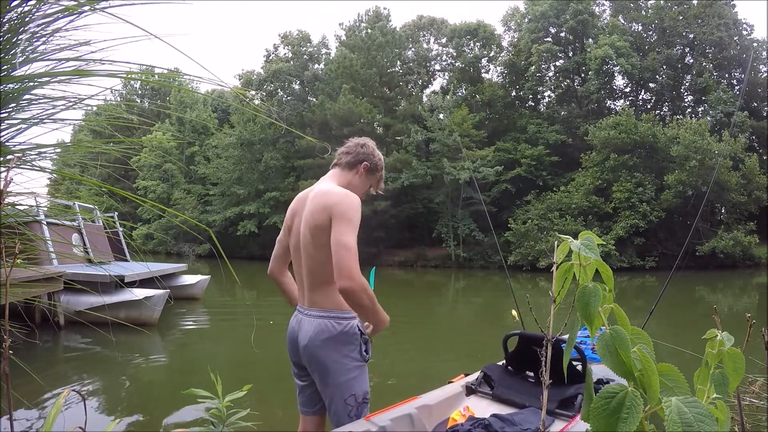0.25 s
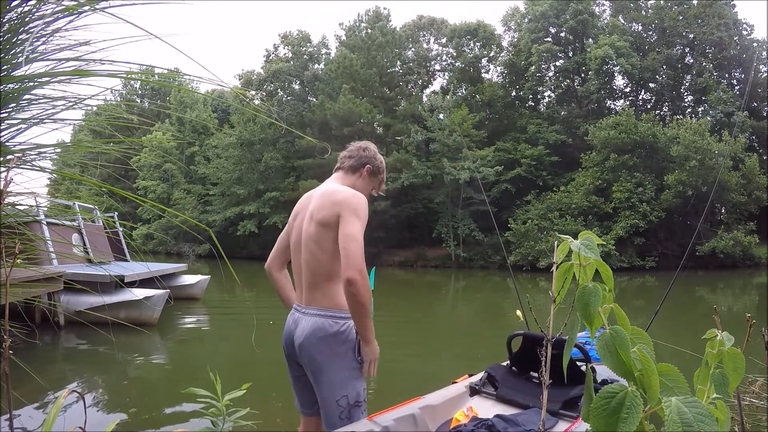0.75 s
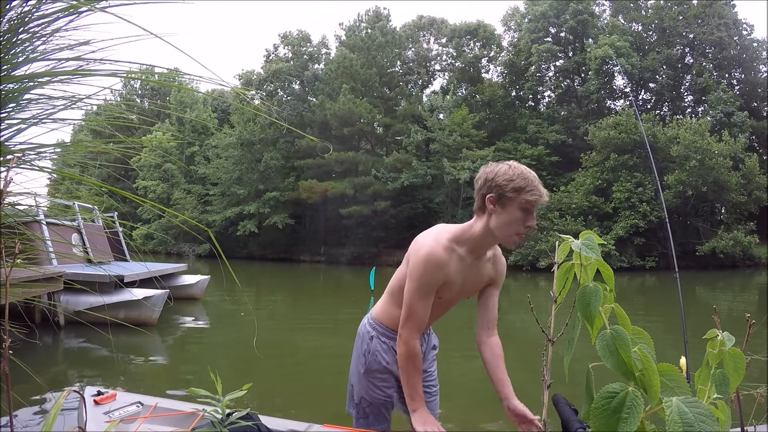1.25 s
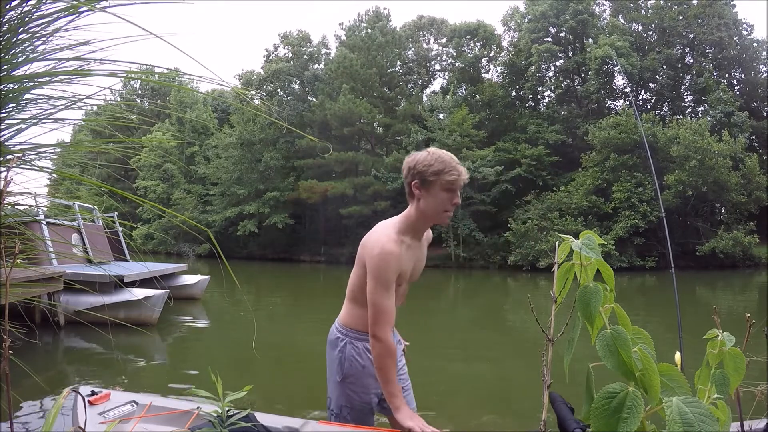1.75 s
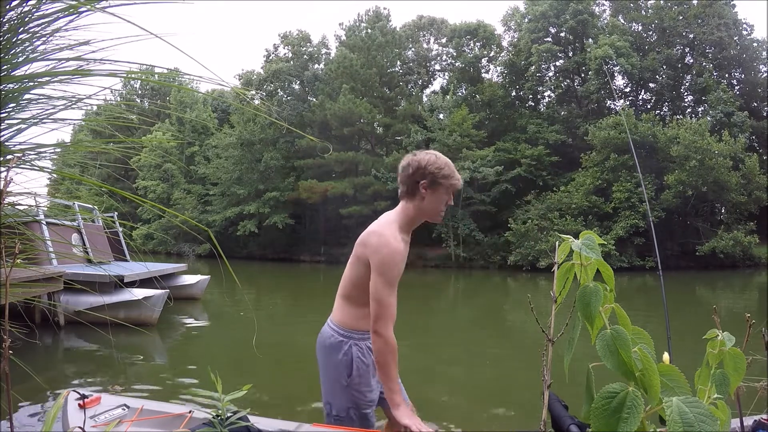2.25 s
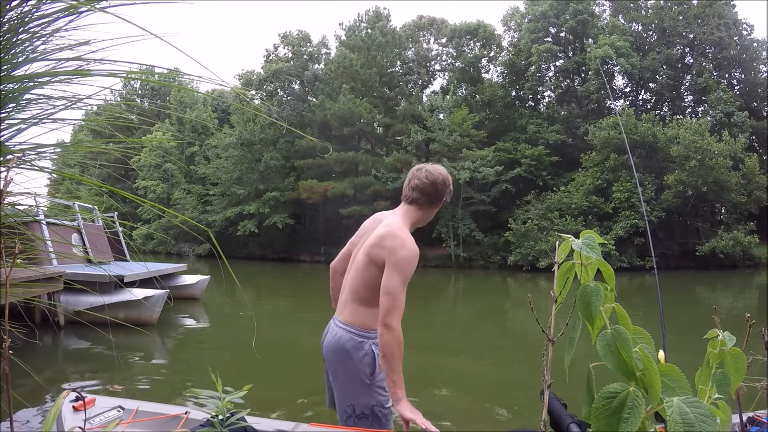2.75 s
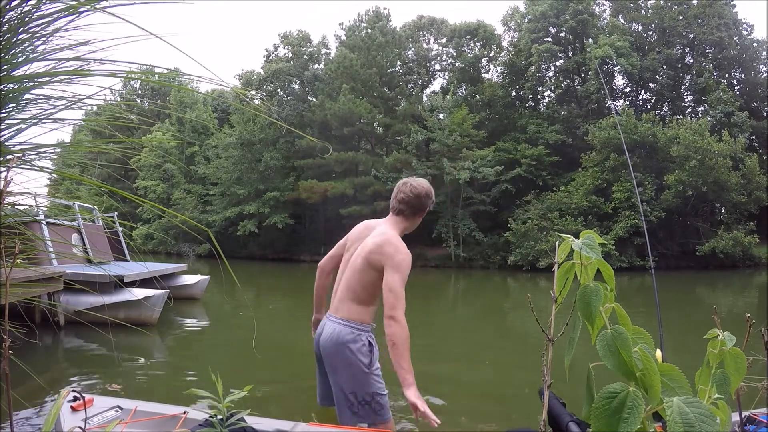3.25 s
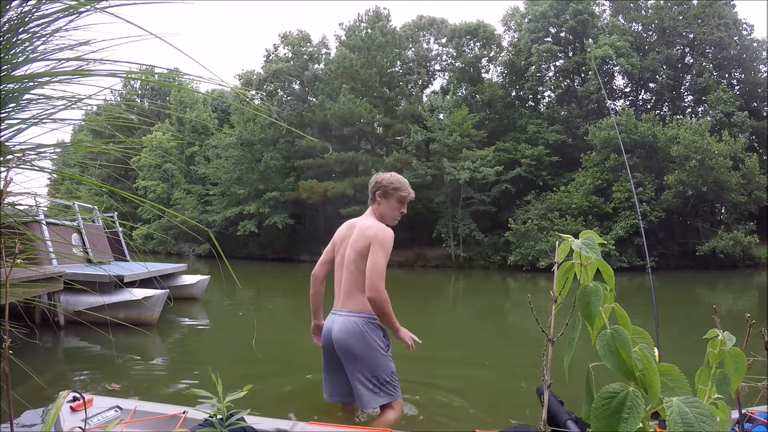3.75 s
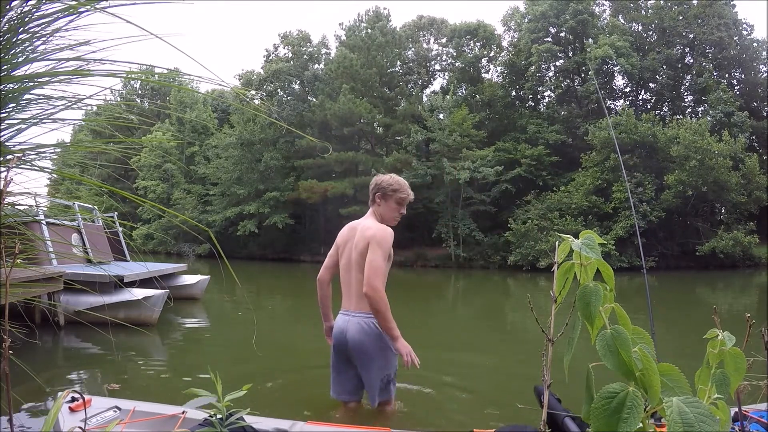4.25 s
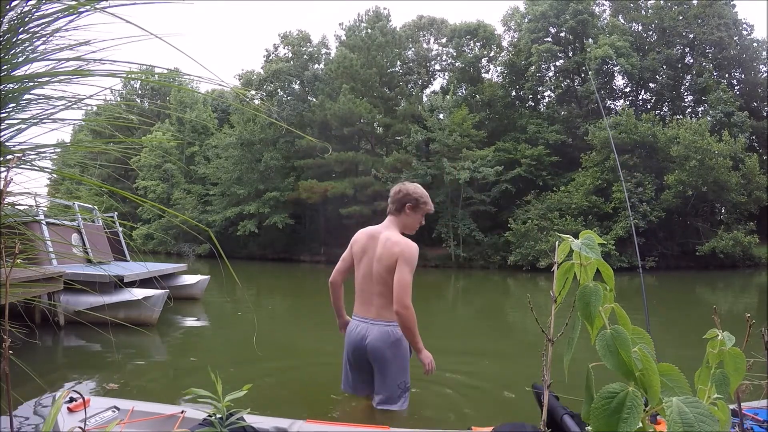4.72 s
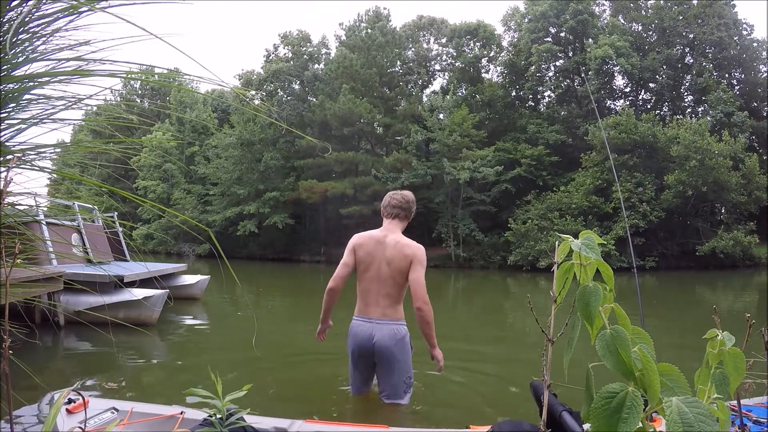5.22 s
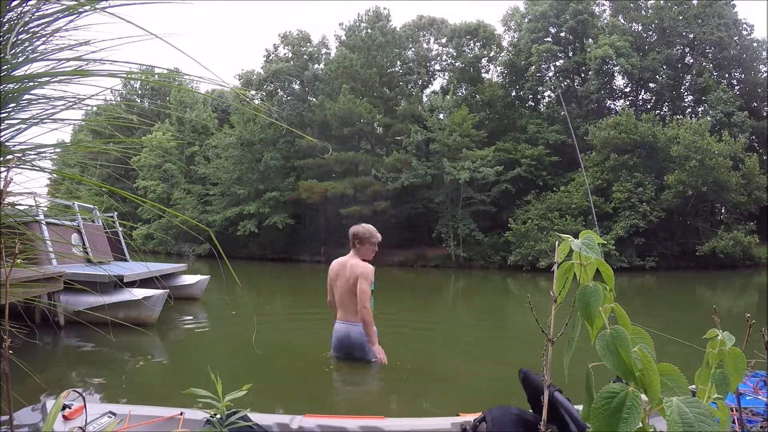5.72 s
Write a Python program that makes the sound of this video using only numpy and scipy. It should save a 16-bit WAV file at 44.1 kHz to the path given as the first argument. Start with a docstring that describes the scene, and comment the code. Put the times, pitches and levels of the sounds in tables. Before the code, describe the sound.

At a quiet lake shore, dry knocks give way to hollow thuds, bubbling splashy wading steps and sparse bird chirps, then an abrupt stop.

```python
"""A kayak and a wader at a lake shore

A kayak clacks and thuds while a person wades into shallow water. Plastic knocks and hull thuds are ringing tones,
and one bare click is a short ring. Steps crackle with random droplets, splash, and trap air bubbles that ring as
sliding, dying tones. Insects, leaves and wind on the microphone are noise shaped in pitch and loudness.
One bird chips three times and a farther one calls once, both as gliding whistles.
Faint echoes follow, until the sound stops abruptly."""
import sys
import numpy as np
from scipy import signal
from scipy.fft import rfft, irfft
from scipy.io import wavfile
from scipy.ndimage import uniform_filter1d

SR = 44100
rng = np.random.default_rng(int(sys.argv[2]) if len(sys.argv) > 2 else 0)


def transcribe(u):
    """Save the signal u as a 16-bit wav file named by the first command-line argument.

    u: samples, shape (n,) or (channels, n), limited to [-1, 1]; the rate is SR.
    q: integer samples, one column per channel.
    """
    v = np.clip(np.atleast_2d(u).T, -1, 1)
    q = np.round(v * 32767).astype(np.int16)
    wavfile.write(sys.argv[1], SR, q)


N = 263718  # length in samples
TIME, BINS = np.arange(N) / SR, np.fft.rfftfreq(N, 1 / SR)  # seconds, Hz


def amp(db):
    """Turns decibels into a gain."""
    return 10 ** (np.asarray(db) / 20)


def unit(x):
    """Scales a sound to an average (rms) level of 1."""
    return x / np.sqrt(np.mean(x ** 2) + 1e-20)


def level(rows):
    """Turns a curve of decibels into a gain for every sample."""
    return amp(np.interp(TIME, *np.transpose(rows)))


def read(points, hz):
    """Reads a table between its points, with pitch on a logarithmic scale."""
    table_hz, value = np.transpose(points)
    return np.interp(np.log(hz + 1), np.log(table_hz + 1), value)


def coloured(x, gains):
    """Multiplies the spectrum of x by the gains, then scales it to rms 1."""
    return unit(irfft(rfft(x) * gains, len(x)))


def drift(hz):
    """Makes a slow random wander with speeds up to about hz."""
    return coloured(rng.standard_normal(N), np.exp(-(BINS / hz) ** 2))


def add(mix, s, sound):
    """Mixes a sound in, starting at s seconds."""
    part = mix[max(round(s * SR), 0):][:len(sound)]
    part += sound[:len(part)]


# How strong the wind rumble is at each pitch. Each row: pitch in Hz, relative strength in dB per Hz.
WIND_SPECTRUM = [(8, -40.5), (15, -9), (28, -5.5), (43, 1.5), (55, 0), (66, -2.5), (90, -5), (122, -8),
                 (160, -14), (200, -20.5), (240, -20), (290, -31.5), (400, -32.5), (600, -66)]
# Gusts that stand out of the steady wind. Each row: middle in seconds, extra level in dB, spread in seconds.
WIND_GUSTS = [(2.374, 4.5, 0.024), (2.725, 1, 0.052), (3.37, 2, 0.032), (5.027, 4.5, 0.036)]
WIND_DB = -43.5  # level of the steady wind


def wind(steadiness=0.28):
    """Eddies buffet the microphone in a steady breeze that swells in a few gusts."""
    eddies = coloured(rng.standard_normal(N), amp(read(WIND_SPECTRUM, BINS)))
    # dividing by part of its own swell evens the rumble out
    swell = np.sqrt(abs(uniform_filter1d(eddies ** 2, size=4400)) + 1e-9)
    steady = unit(eddies / swell ** steadiness)
    gusts_db = sum(db * np.exp(-.5 * ((TIME - s) / spread) ** 2) for s, db, spread in WIND_GUSTS)
    return amp(WIND_DB + gusts_db) * steady


# Tone of the wash of leaves and open water. Each row: pitch in Hz, relative strength in dB per Hz.
AIR_SPECTRUM = [(100, -11.5), (220, 10.5), (400, 5), (700, 1.5), (1200, -1), (2500, -6), (5000, -8),
                (8600, -14.5), (12000, -17), (15000, -19.5)]
# How loud that wash is over time, before its flutter. Each row: time in seconds, level in dB.
AIR_LOUDNESS = [(0, -62), (1.15, -62.5), (1.8, -60), (2.3, -61), (3.6, -62.5), (4.3, -61), (5.35, -62.5)]


def air(flutter_db=1.0, flutter_hz=30):
    """Leaves and ripples blur into a distant wash of noise, fluttering slightly."""
    wash = coloured(rng.standard_normal(N), amp(read(AIR_SPECTRUM, BINS)))
    return level(AIR_LOUDNESS) * wash * amp(flutter_db * drift(flutter_hz))


# Bands of the insect chorus. Each row: centre pitch in Hz, spread in Hz, level in dB before the slow swell.
INSECT_BANDS = [(6703, 110, -60.5), (6917, 102, -60.5), (6810, 580, -69.5), (7880, 130, -75),
                (8120, 60, -77.5)]


def insects(swell_db=0.66):
    """Countless far insects blur into a few bands of noise around their body resonances."""
    power = sum(amp(db) ** 2 / spread * np.exp(-.5 * ((BINS - hz) / spread) ** 2)
                for hz, spread, db in INSECT_BANDS)
    total = np.sqrt(sum(amp(db) ** 2 for _, _, db in INSECT_BANDS))
    chorus = coloured(rng.standard_normal(N), np.sqrt(power))
    return total * chorus * amp(swell_db * drift(8.6))


def clack(hz, t60, rattle_db, edge_hz, rattle_t60=0.019, rattle_hz=2800):
    """A sharp edge starts a ring that dies fast and a short gritty rattle (t60: seconds to fall 60 dB)."""
    t = np.arange(SR // 10) / SR
    dull = 1 / np.sqrt(1 + (np.fft.rfftfreq(len(t), 1 / SR) / rattle_hz) ** 3)
    ring = amp(-60 * t / t60) * np.cos(2 * np.pi * hz * t)
    rattle = amp(rattle_db - 60 * t / rattle_t60) * coloured(rng.standard_normal(len(t)), dull)
    rounding = signal.butter(2, min(edge_hz, SR / 3), fs=SR)  # a low-pass rounds the edge, as yielding plastic does
    return signal.lfilter(*rounding, ring + rattle)


# Before the hull seats, it skips in ever shorter hops, each louder and deeper than the last.
HOP_SHRINK = .5  # each hop starts this fraction as far ahead of the knock as the one before
HOP_FIRST_DB, HOP_LAST_DB = -18, -5  # compared with the knock
HOP_FIRST_HZ, HOP_LAST_HZ = 740, 350
HOP_T60, HOP_RATTLE_DB, HOP_EDGE_HZ = .024, -9, 2400  # every hop is a small, dull clack
# Dry clacks of the boat and its gear, and one bare click at 1.1976 s. Each row: start in seconds,
# level in dB before the edge is rounded, pitch in Hz, time to fall 60 dB in seconds,
# rattle in dB compared with the ring, sharpness of the edge in Hz, lead-in of chatter in seconds (0 for none).
CLACKS_AND_CLICK = [(.087, -50.5, 700, 0.022, -12, 4000, 0), (0.4883, -30, 950, .005, -11.5, 6500, .023),
                    (.695, -51, 785, .054, -4, 1800, 0), (0.7337, -37, 700, .003, -6, 6500, .009),
                    (1.1976, -36, 330, 0.0076, -28, 14000, 0)]


def clacks(count=4):
    """Plastic parts knock together, some led in by a quickening chatter of hops; one bare click sounds alone."""
    out = np.zeros(N)
    hops = list(zip(HOP_SHRINK ** np.arange(count),
                    np.linspace(HOP_FIRST_DB, HOP_LAST_DB, count),
                    np.geomspace(HOP_FIRST_HZ, HOP_LAST_HZ, count)))
    for s, db, hz, t60, rattle_db, edge_hz, lead in CLACKS_AND_CLICK:
        add(out, s, amp(db) * clack(hz, t60, rattle_db, edge_hz))
        for ahead, hop_db, hop_hz in hops if lead > 0 else []:
            hop = clack(hop_hz, HOP_T60, HOP_RATTLE_DB, HOP_EDGE_HZ)
            add(out, s - lead * ahead, amp(db + hop_db) * hop)
    return out


def droplets(per_s, spread_db):
    """Tiny impacts fall at random moments, a few of them large."""
    size = amp(spread_db * np.minimum(rng.exponential(1, N), 4)) * rng.choice([-1, 1], N)
    return size * (rng.random(N) < per_s / SR)


# Splashes and spray. Each row: start in seconds, level in dB at the height of the swell, centre pitch in Hz,
# length in seconds (the swell peaks after a quarter of it).
WATER_SPLASHES = [(0.157, -60.5, 2720, 0.047), (1.726, -63, 5000, 0.017), (1.852, -61.5, 11000, .015),
                  (2.497, -57, 1650, .013), (2.707, -53.5, 1650, .025), (2.748, -64.5, 3200, 0.023),
                  (2.842, -54.5, 2300, 0.019), (2.877, -55, 1250, .017), (2.94, -66.5, 11000, .022),
                  (4.725, -58, 11000, 0.0046), (4.781, -60, 1900, 0.044), (4.842, -58.5, 1290, .022),
                  (4.862, -56, 700, 0.046), (4.952, -60.5, 1310, 0.039), (5.2, -58.5, 2300, 0.026),
                  (5.206, -61.5, 11000, .01)]


def splashes(width_octaves=0.6):
    """Each splash is a quick swell of droplets around one pitch."""
    out, t = np.zeros(N), np.arange(SR // 5) / SR
    hz = np.fft.rfftfreq(len(t), 1 / SR) + 1
    drops = droplets(per_s=4500, spread_db=2.5)
    for s, db, centre, length in WATER_SPLASHES:
        band = np.exp(-.5 * (np.log2(hz / centre) / width_octaves) ** 2)
        spray = coloured(drops[round(s * SR):][:len(t)], band)
        age = 4 * t / length
        swell = age * np.exp(1 - age)
        add(out, s, amp(db) * swell * spray)
    return out


def bubble(hz, t60, rise, onset_cycles=1.07):
    """Trapped air rings like a dying sine whose pitch slides (rise in octaves per second) as the bubble moves."""
    t = np.arange(SR // 8) / SR
    turns = np.cumsum(hz * 2 ** np.clip(rise * t, -1, 1)) / SR
    onset = 1 - np.exp(-turns / onset_cycles)
    return amp(-60 * t / t60) * onset * np.sin(2 * np.pi * turns)


BUBBLE_T60 = 0.049  # seconds for a 1 kHz bubble to fall 60 dB
BUBBLE_SHORTENING = 0.31  # smaller, higher bubbles die sooner by this power of pitch
# Gurgles and drips. Each row: start in seconds, level in dB before the shared trim and the fading of the ring,
# starting pitch in Hz, rise in octaves per second (negative falls).
WATER_BUBBLES = [(0.317, -57, 3900, -7), (1.724, -52, 3600, 2), (2.497, -49.5, 1183, -4),
                 (2.535, -53, 2380, -21.5), (2.596, -54, 615, 1.5), (2.657, -47.5, 615, 9),
                 (2.684, -45.5, 1475, 6.5), (2.700, -45.5, 690, 3.5), (2.713, -47, 595, 7.5),
                 (2.729, -40, 718, 17.5), (2.751, -46.5, 923, 4), (2.783, -50, 425, -15),
                 (2.817, -46, 515, 17), (2.836, -45.5, 1374, 10.5), (2.842, -48, 710, 7),
                 (2.846, -54, 2660, 36.5), (2.8825, -37, 565, -4), (2.882, -46.5, 1008, 12.5),
                 (2.921, -52, 5120, -1.5), (2.986, -45.5, 2970, 7.5), (3.015, -53.5, 3700, 21),
                 (3.101, -52, 2370, 3.5), (4.572, -55, 2970, 6), (4.659, -53, 3300, 36.5),
                 (4.695, -54, 3220, 30), (4.753, -48, 915, 5.5), (4.787, -51.5, 2330, -14.5),
                 (4.852, -50, 1300, 3.5), (4.867, -45.5, 1005, 12.5), (4.872, -44, 630, 9.5),
                 (4.967, -54, 2370, -2), (4.976, -53, 1117, -3.5), (5.016, -57.5, 2980, 15),
                 (5.124, -57, 1250, 25)]


def bubbles(trim_db=1):
    """The larger gurgles and drips ring one by one; the low ones ring longest."""
    out = np.zeros(N)
    for s, db, hz, rise in WATER_BUBBLES:
        t60 = BUBBLE_T60 * (1000 / hz) ** BUBBLE_SHORTENING
        add(out, s, amp(db) * bubble(hz, t60, rise))
    return amp(trim_db) * out


def whistle(s, length, start_hz, top_hz, top_at, db, waver=0.011, overtone_db=-22, fall=0.72, fullness=1.1):
    """A wavering whistle swells and fades as its pitch arches, sinking more gently, with a faint octave above."""
    u = np.arange(0, length, 1 / SR) / length  # place within the whistle, 0-1
    hz = top_hz - (top_hz - start_hz) * (u / top_at - 1) ** 2 * np.where(u < top_at, 1, fall)
    phase = 2 * np.pi * np.cumsum(hz * (1 + waver * drift(400)[:len(u)])) / SR
    swell = abs(np.sin(np.pi * u)) ** fullness
    tone = np.sin(phase) + amp(overtone_db) * np.sin(2 * phase)
    out = np.zeros(N)
    add(out, s, amp(db) * swell * tone)
    return out


# Chips of the nearer bird. Each row: start in seconds, reference level in dB, reference top pitch in Hz,
# reference length in seconds; the voices below adjust all four.
BIRD_CHIPS = [(1.636, -51.5, 3900, 0.051), (3.077, -51.5, 3955, .061), (4.196, -50, 3930, .059)]
# The whistles that make up a chip. Each row: delay in seconds, share of the chip's length, start pitch and
# top pitch as multiples of the chip's pitch, place of the top (0-1 is inside the whistle), level change in dB.
CHIP_VOICES = [(0, 0.97, .78, 1, .47, -0.5), (0.013, 0.66, .95, 1.08, 0.48, -1),
               (0.0011, .42, 1.14, 1.5, 1.25, -7.5)]


def bird(echo_db=-17, echo_s=0.0048):
    """Two whistles a little apart beat against each other, under a brief higher upsweep."""
    out = np.zeros(N)
    for s, chip_db, hz, length in BIRD_CHIPS:
        for delay, share, low, high, top_at, db in CHIP_VOICES:
            out += whistle(s + delay, length * share, hz * low, hz * high, top_at, chip_db + db, overtone_db=-31)
    add(out, echo_s, amp(echo_db) * out)  # bounce off the water
    return out


# Tone of the water crackling around the leg. Each row: pitch in Hz, relative strength in dB per Hz.
SLOSH_SPECTRUM = [(150, -10.5), (400, 7.5), (800, -1), (1600, -6.5), (3500, -6), (7000, -18),
                  (15000, -24.5)]
# Strides through the water. Each row: moment of the strongest push in seconds, level in dB before the crackle
# and froth settings, swell and settling in seconds (each the time to change by a factor of about 2.7).
WADING_STRIDES = [(1.74, -65, .12, 0.61), (2.74, -59, .1, 0.15), (2.88, -58.5, 0.07, .13),
                  (4.85, -62.5, 0.1, 0.36)]


def wading(crackle_db=-2, froth_db=-3, per_size_s=35, ring_cycles=28, rise=10, tilt_db=-2):
    """With each stride water crackles around the leg and folds in small bubbles of many sizes, then settles."""
    crackle = coloured(droplets(per_s=900, spread_db=3.5), amp(read(SLOSH_SPECTRUM, BINS)))
    froth = np.zeros(N)
    for hz in np.geomspace(550, 5000, num=24):
        tilt = amp(tilt_db * np.log2(hz / 1000))  # higher bubbles are weaker
        ring = tilt * bubble(hz, ring_cycles / hz, rise * rng.random())
        froth += signal.oaconvolve(droplets(per_s=per_size_s, spread_db=5.5), ring)[:N]
    pushes = [amp(db) * np.exp(-np.maximum((s - TIME) / swell, (TIME - s) / settling))
              for s, db, swell, settling in WADING_STRIDES]
    push = np.linalg.norm(pushes, axis=0)  # strides add up as power
    return push * (amp(crackle_db) * crackle + amp(froth_db) * unit(froth))


# Ringing tones of the plastic hull. Each row: pitch in Hz, relative level in dB, time to fall 60 dB in seconds.
HULL_MODES = [(62, -1, 0.056), (104.5, 1.5, 0.11), (156, 0.5, 0.078), (248, -7.5, 0.068),
              (323.2, -4.5, 0.12), (479, -2.5, 0.039), (650, -8.5, 0.04), (805, -11, .06),
              (980, -20.5, 0.091), (1250, -23.5, .03)]
# Thuds on the hull. Each row: start in seconds, level in dB applied to the hull's ring, contact time in seconds.
HULL_THUDS = [(2.245, -43.5, 0.0012), (2.2495, -32.5, 0.0015), (2.269, -35.5, 0.0043),
              (2.79, -41.5, 0.0046), (5.231, -34.5, 0.0068)]


def hull():
    """Soft blows ring the hollow hull; a longer contact leaves only the low tones."""
    out, t = np.zeros(N), np.arange(SR // 2) / SR
    ring = sum(amp(db - 60 * t / t60) * np.sin(2 * np.pi * hz * t) for hz, db, t60 in HULL_MODES)
    for s, db, contact in HULL_THUDS:
        force = t * np.exp(-2 * np.pi * t / contact)
        add(out, s, amp(db) * signal.fftconvolve(ring, force / force.sum()))
    return out


# Thin upsweep of the farther bird. Each row: start in seconds, level in dB, length in seconds,
# start pitch in Hz, top pitch in Hz (the call fades before reaching it).
FAR_BIRD_CALLS = [(4.013, -56, 0.034, 5000, 7690)]


def far_bird():
    """One rasping whistle sweeps up, still rising as it fades."""
    return sum(whistle(s, length, start_hz, top_hz, top_at=1.3, db=db, waver=.04, overtone_db=-14)
               for s, db, length, start_hz, top_hz in FAR_BIRD_CALLS)


# How long echoes last along the shore. Each row: pitch in Hz, time to fall 60 dB in seconds.
SHORE_DECAY = [(100, 0.19), (1000, 0.2), (4000, 0.46), (12000, 0.064)]


def shore(x):
    """Trees and bank return scattered echoes, each band of pitch dying at its own speed."""
    taps = rng.standard_normal(SR) * (rng.random(SR) < 2500 / SR)  # about 2500 echoes in one second
    taps[:SR // 200] = 0  # no echo in the first 5 ms
    hz, t, bands = signal.stft(taps, SR, nperseg=256)
    fading = amp(-60 * t / read(SHORE_DECAY, hz)[:, None])
    tail = signal.istft(bands * fading, SR, nperseg=256)[1]
    return signal.fftconvolve(x, tail / np.linalg.norm(tail))[:N]


def scene(near_echo_db=-15, bird_echo_db=-14, far_echo_db=0):
    """Near sounds and the nearer bird have faint echoes; the far bird's echo is as strong as its direct call."""
    near = hull() + clacks() + bubbles() + splashes() + wading()
    chips, far_call = bird(), far_bird()
    echoes = shore(amp(near_echo_db) * near + amp(bird_echo_db) * chips + amp(far_echo_db) * far_call)
    return (near + chips + far_call + echoes + wind() + air() + insects())[None]


STOP_S, EDGE_HZ = 5.37, 15400  # when the sound stops, and the top of the pitch range


def record(dry):
    """The sound stops abruptly within 3 ms; a steep filter then removes the highest pitches."""
    gate = np.clip((STOP_S - TIME) / .003 + 1, 0, 1)
    band_limit = signal.firwin(511, EDGE_HZ, window=("kaiser", 9), fs=SR)
    return signal.oaconvolve(dry * gate, band_limit[None], "same")


dry = scene()
out = record(dry)
transcribe(out)
```